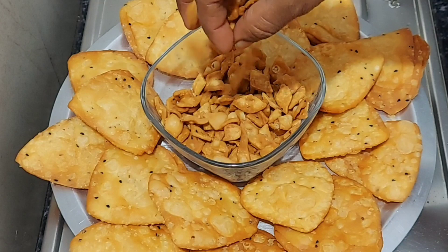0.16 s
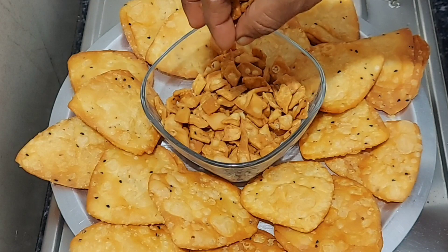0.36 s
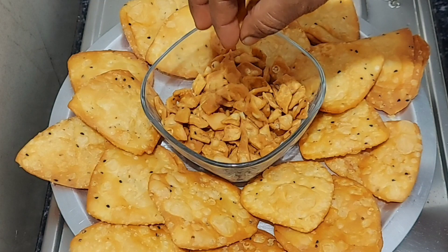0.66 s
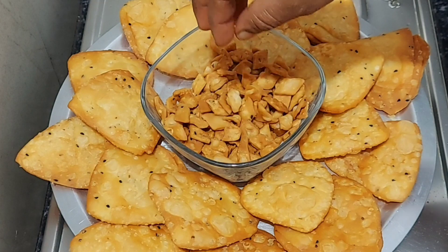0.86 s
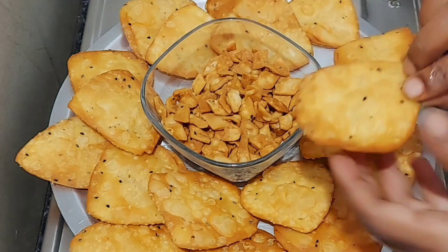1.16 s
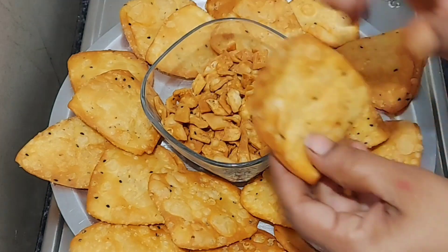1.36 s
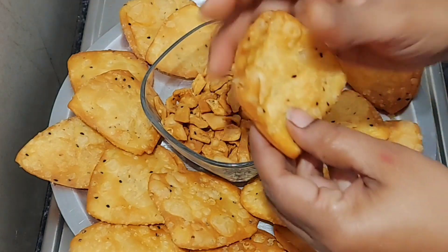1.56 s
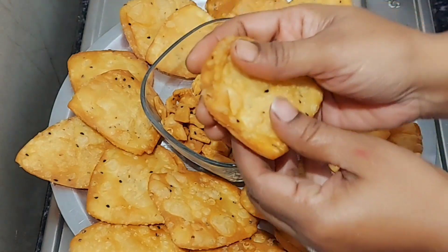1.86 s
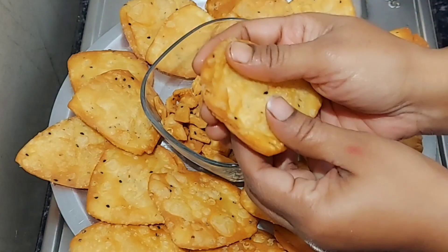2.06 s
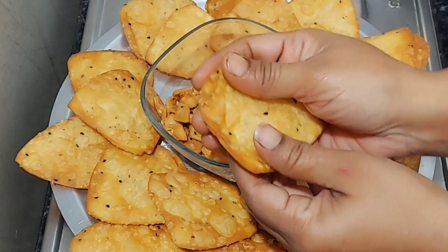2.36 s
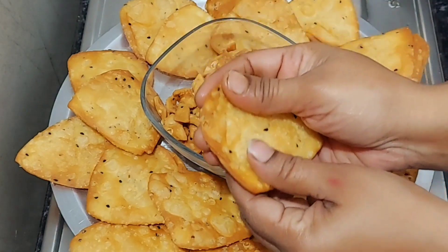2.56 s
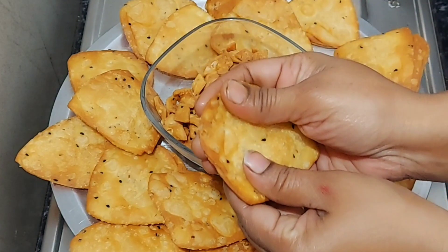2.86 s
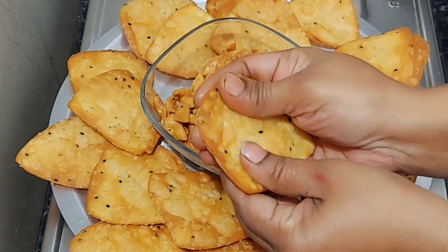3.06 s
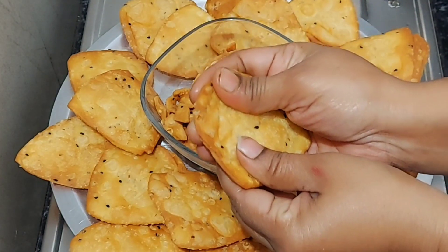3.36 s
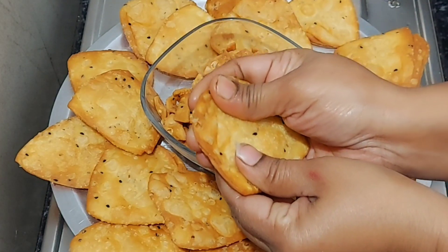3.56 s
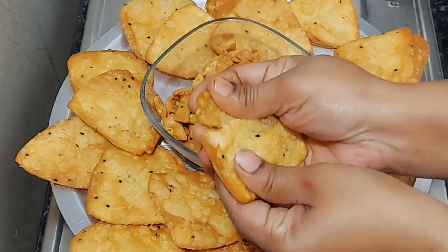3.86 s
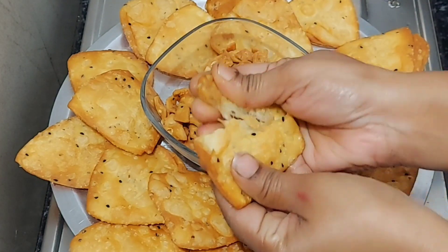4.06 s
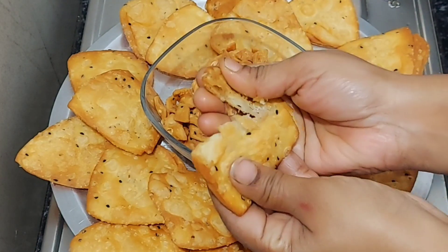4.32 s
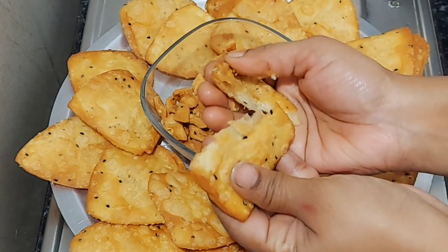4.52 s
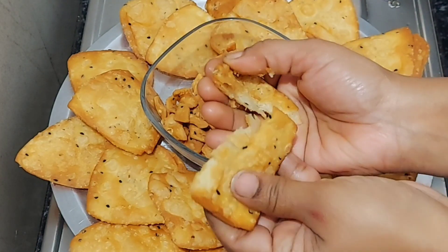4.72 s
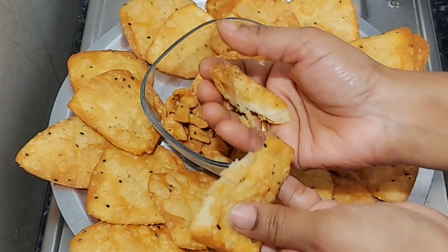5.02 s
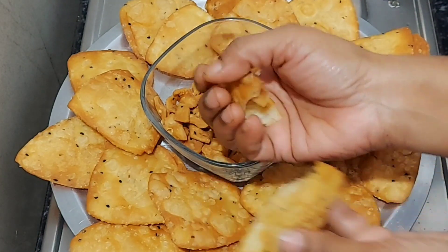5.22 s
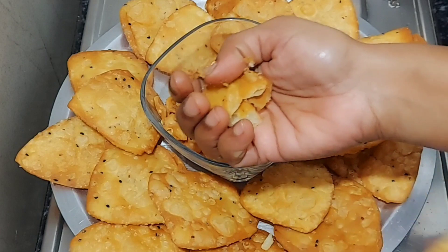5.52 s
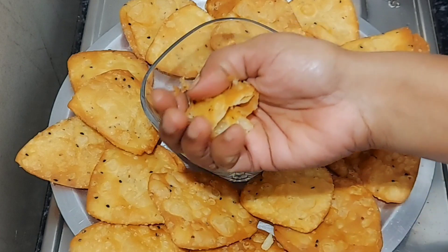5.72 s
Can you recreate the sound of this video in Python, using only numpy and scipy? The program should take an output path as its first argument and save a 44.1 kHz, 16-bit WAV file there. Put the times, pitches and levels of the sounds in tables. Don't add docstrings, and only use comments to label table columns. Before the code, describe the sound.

Crisp fried pieces patter into a ringing glass bowl, then a large crisp is rubbed and snapped in loud clustered crunches, with faint crumbling afterwards.

```python
import sys
import numpy as np
from scipy import signal
from scipy.fft import rfft, irfft, next_fast_len
from scipy.io import wavfile
from scipy.ndimage import map_coordinates

SR = 44100
rng = np.random.default_rng(int(sys.argv[2]) if len(sys.argv) > 2 else 0)


def ratio_of_db(decibels):
    return 10 ** (np.asarray(decibels, float) / 20)


def transcribe(signal):
    frames = np.atleast_2d(signal).T
    limited = np.clip(frames, -1, 1)
    pcm = np.round(limited * 32767).astype(np.int16)
    wavfile.write(sys.argv[1], SR, pcm)


N = 259605


def unit(x):
    return x / np.sqrt(np.mean(x ** 2) + 1e-20)


def along(points, hz):
    f, v = np.transpose(points)
    return np.interp(np.log(hz + 1), np.log(f + 1), v)


def curves(rows):
    s, *columns = np.transpose(rows)
    return [np.interp(np.arange(N) / SR, s, column) for column in columns]


def sides(pan_db):
    return ratio_of_db(np.array([pan_db / 2, -pan_db / 2]))


def wobble(rate, size=N):
    knots = rng.standard_normal(int(size * rate / SR) + 4)
    return map_coordinates(knots, [np.arange(size) * rate / SR])


def filtered(x, response):
    m = next_fast_len(N + SR // 2)
    return irfft(rfft(x, m) * response(np.fft.rfftfreq(m, 1 / SR)), m)[..., :N]


def peak(f, hz, width_hz):
    return 1j * f * width_hz / (hz * hz - f * f + 1j * f * width_hz)


# (f/Hz, correlation)
PORT_LIKENESS = [(60, 0.8), (180, 0.93), (550, -0.094), (1650, -0.03), (4970, -0.26), (15000, 0.36)]


def stereo(pair, spectrum):
    def mixing(hz):
        turn = np.arccos(np.clip(along(PORT_LIKENESS, hz), -1, 1)) / 2
        return ratio_of_db(along(spectrum, hz)) * [np.cos(turn), np.sin(turn)]

    mid, side = filtered(pair, mixing)
    return unit(np.array([mid + side, mid - side]))


def strokes(rows):
    swing_db = 20
    t, level = np.arange(N) / SR, np.full(N, -120.)
    for s, db, rise, fall in rows:
        away = np.maximum((s - t) / max(rise, .002), (t - s) / max(fall, .002))
        level = np.maximum(level, db - swing_db * away)
    return level


def fractures(rows, t60, width, body_spread, treble_spread, kick):
    size = 2048
    out = np.zeros((2, N + SR))
    t, f = np.arange(size // 2) / SR, np.fft.rfftfreq(size, 1 / SR)
    for s, db, snap_db, hz, *length in rows:
        shared, spikes, *own = rng.standard_normal((4, len(t)))
        own = np.array(own)
        shared[8:11] += kick
        spiky = ratio_of_db(4 * np.repeat(spikes, 16)[:len(t)])
        decay = ratio_of_db(-60 * np.maximum(t - sum(length), 0) / t60)
        shape = spiky * decay * (1 - np.exp(-t / 0.00012))
        low = rfft(shape * (shared + body_spread * own), size)
        fading = ratio_of_db(-60 * t / 0.033)
        high = rfft(shape * fading * (shared + treble_spread * own), size)
        piece = peak(f, hz, width * hz) + 0.29 * peak(f, hz, 2.0 * hz)
        body = irfft(low * piece * peak(f, 3680, 7300) ** 2, size)
        snap = irfft(high * peak(f, 11000, 18000) ** 2, size)
        snap_gain = ratio_of_db(snap_db + 6.0) * sides(3.1)[:, None]
        both = body / np.abs(body).max() + snap_gain * snap / np.abs(snap).max()
        out[:, round(s * SR):][:, :size] += ratio_of_db(db + 1.21) * both
    return out[:, :N]


# (t/s, peak level/dB, treble level/dB re peak, body f/Hz)
LANDINGS = [(0.0523, -19, -2.5, 4330), (0.1688, -40, 0.5, 3230), (0.1741, -29, 1, 3230),
            (0.1833, -17, -6.5, 3730), (0.1926, -27.5, -5, 6030), (0.264, -30, -3.5, 3620),
            (0.2681, -28, 4.5, 8440), (0.3064, -20.5, -13.5, 3080), (0.3718, -42, 7, 2970),
            (0.6386, -42.5, -1.7, 6440), (0.6612, -42.5, 5.5, 2260), (0.6756, -30.5, 0, 6140),
            (0.6811, -24.5, -1, 8700), (0.6902, -25, -6.5, 3550), (0.7131, -26.5, 0, 6070),
            (0.7241, -25.5, -4.5, 3320), (0.7396, -25, -12, 5960), (0.7499, -23.5, 0.4, 3100),
            (0.7538, -23, 2, 6100), (0.7814, -23.5, -4, 2840), (0.7855, -28.5, -4, 4630),
            (0.8269, -32.5, -10, 3100)]
BLISTERS = [(0.5238, -36.5, -26, 7040), (1.2467, -30.5, -5, 7260), (1.3172, -47, -1.5, 7200),
            (1.6484, -59.5, 10.5, 6830), (2.1521, -36, -18.5, 4910), (2.1589, -37, -14, 4850),
            (2.2478, -33.5, -19, 4520), (2.5212, -41.5, -3.5, 6090), (2.5419, -37.5, -9, 6030),
            (2.5543, -31.5, -7, 5040), (2.58, -45, 2.5, 4910), (2.6351, -54.5, 1, 7320),
            (2.6799, -43, -4.5, 5040), (2.6869, -42.5, -3, 3900), (2.7438, -33, -6.5, 4200),
            (2.754, -38.5, -7.5, 4090), (2.8616, -53, 13.5, 8480), (2.8786, -32.5, -4.5, 5170),
            (2.897, -36, -11.5, 5020), (2.9101, -40.5, 4, 2880), (2.9666, -47, 3.5, 6290),
            (2.9753, -43, 5, 4670), (2.9795, -27.5, 6.5, 8420), (3.001, -34, 14.5, 8480),
            (3.3197, -29.5, 1.5, 6030), (3.8866, -21, -3.5, 5400)]
SPLITS = [(3.0065, -18, -5, 6700), (3.1084, -32, -5, 2462), (3.1479, -15.5, -14.5, 2450),
          (3.1554, -20, -3, 2370), (3.1852, -31, -3, 2450), (3.1979, -22, -12, 2300),
          (3.2302, -36.5, 2, 2336), (3.3001, -42.5, 3, 6220), (3.3257, -34, 2, 4200),
          (3.3286, -31.5, -5.5, 3890), (3.3731, -41.5, -7, 3480), (3.409, -30, -10.5, 2260),
          (3.455, -37.5, -1.5, 3880), (3.4694, -19, -5.5, 3730), (3.5004, -25.5, -3, 4260),
          (3.5123, -25, -12.5, 3875), (3.5203, -24.5, -5, 3876), (3.5296, -19, -6.5, 2250),
          (3.533, -24.5, -5, 5494), (3.5497, -19, -2, 3536), (3.563, -22, -8.5, 2280),
          (3.5647, -1, -10.5, 2387), (3.5708, -10.5, -11, 5570), (3.5759, -12, -9.5, 3100),
          (3.5848, -20.5, -7, 3440), (3.605, -12.5, -5, 5320), (3.6876, -6, -13.5, 2370),
          (3.7148, -11, -12.5, 2710), (3.723, -16, -11, 2580), (3.7382, -12.5, -14, 2480),
          (3.7491, -16.5, -12, 2203), (3.7605, -22.5, -9, 2410), (3.8114, -32, 1.5, 2580),
          (3.838, -18, -21, 2520), (3.8471, -25.5, -15, 2780), (3.8511, -19.5, -17.5, 2510),
          (3.8636, -19, -3, 2600), (3.8821, -24.5, -9, 2560), (3.9768, -43, 5.5, 5000),
          (4.037, -37, -9.5, 2530), (4.0409, -53.5, 12, 3230), (4.1501, -47, -9, 6290)]
CRUSHED = [(4.284, -48.5, -3.5, 3580), (4.7138, -43, -4.5, 5640), (4.7962, -52, 11, 8480),
           (4.8286, -47.5, 12, 8480), (5.0601, -30.5, -20.5, 2690), (5.158, -42.5, -2.5, 5500),
           (5.1847, -40, 0, 8300), (5.2182, -44.5, 7, 7210), (5.2342, -42.5, 5, 7110),
           (5.2978, -44, 5, 8400), (5.3452, -41, -0.5, 5300), (5.357, -40.5, 1.5, 4650),
           (5.3787, -29, -6, 5850), (5.3926, -37, -4, 5700), (5.4049, -29.5, 1, 5430),
           (5.4394, -35.5, 2.5, 7080), (5.4738, -41, 0.5, 4380), (5.4816, -37.5, -4, 4910),
           (5.5975, -49.5, 0.5, 4010), (5.626, -43.5, 2.5, 5560), (5.6471, -32, 3, 5700),
           (5.7083, -29, 1, 6230), (5.7507, -43, 3, 6030), (5.778, -45, 3.5, 5490),
           (5.7967, -29, 2.5, 6360), (5.864, -32, 5.5, 6290)]


def cracks():
    rows = [*LANDINGS, *BLISTERS, *SPLITS, *CRUSHED]
    return fractures(rows, t60=0.0034, width=0.19, body_spread=0.073, treble_spread=7.3, kick=4)


# (t/s, peak level/dB, treble level/dB re peak, body f/Hz, length/s)
TEARS = [
    (0.288, -17.5, -14, 4770, 0.0013),
    (3.0112, -8.5, -4.5, 2465, 0.0052),
    (3.0118, -14, -29.5, 1124, 0.0066),
    (3.566, -10, -12.5, 2509, 0.0013),
    (3.6817, -3, -4.5, 2340, 0.0049),
    (5.841, -19.5, -1.5, 5320, 0.0029),
]


def tears():
    return fractures(TEARS, t60=0.0098, width=0.33, body_spread=0.47, treble_spread=8.8, kick=1.8)


def crumbs(rate, spread_db, noise):
    chance = rate / SR * ratio_of_db(1.3 * wobble(40))
    sizes = ratio_of_db(spread_db * rng.exponential(1, (2, N))) * rng.choice([-1, 1], (2, N))
    grains = (rng.random((2, N)) < chance) * sizes
    return unit(grains) + noise * rng.standard_normal((2, N))


# (f/Hz, level/dB per Hz)
FIZZ = [(5500, -43), (7500, -5), (9000, -3), (12000, 0), (14000, 2), (16500, -8.5)]


def rubbing(rows, surface, rate, spread_db, noise):
    body_db = strokes([row[:4] for row in rows])
    fizz_db = strokes([(s, db + rel_db, rise, fall) for s, db, rise, fall, rel_db in rows])
    body = ratio_of_db(body_db) * stereo(crumbs(rate, spread_db, noise), surface)
    return body + ratio_of_db(fizz_db) * stereo(crumbs(rate, spread_db, noise), FIZZ)


# (peak t/s, level/dB, rise/s, fall/s, fizz level/dB re body)
RUBS = [(.642, -59, .004, 0.36, -10), (.68, -47, .01, 0.19, -8.5), (.758, -35, 0.081, 0.07, -7.5),
        (1.244, -43.5, 0.0365, 0.055, -8), (1.3, -60, 0.13, 0.16, -8), (1.66, -67.5, 0.081, 0.09, -5.5),
        (1.763, -57.5, 0.0091, 0.42, -13), (1.879, -50, 0.11, 0.14, -7.5), (2.12, -61, 0.29, 0.089, -8),
        (2.15, -49.5, 0.05, 0.095, -14.5), (2.246, -52, .01, 0.18, -21), (2.314, -56, 0.29, 0.13, -8.5),
        (2.718, -59.5, 0.27, 0.56, -3.5), (2.9, -58.5, 0.59, .2, -5.5), (4.46, -71.5, 0.0235, 0.99, -0.5),
        (4.648, -55, 0.012, 0.19, 3.5), (4.83, -61.5, .01, 0.18, 3), (5.07, -61, 0.026, 0.62, -9),
        (5.24, -55, 0.29, 0.5, -2.5), (5.41, -47.5, 0.085, 0.18, -4.5), (5.71, -56, 0.12, .3, -8.5),
        (5.85, -48.5, 0.71, 0.607, -5)]
# (f/Hz, level/dB per Hz)
CRUST = [(1060, -17), (1800, -13), (2150, -19), (2730, -3.5), (4500, -2), (5020, 0.5), (7910, -7.5),
         (8500, -13), (11000, -28), (18700, -120)]


def crust_rubbing():
    return rubbing(RUBS, CRUST, rate=3400, spread_db=2.5, noise=1.2)


# (peak t/s, level/dB, rise/s, fall/s, fizz level/dB re body)
GRINDS = [(0.001, -39.5, 0.0079, .24, -14), (.228, -56.5, 0.83, .33, -2.5), (3.02, -39, 0.012, .15, -9),
          (3.58, -33, .012, .12, -10), (3.15, -66, 0.41, 0.52, 6.5), (3.492, -47.5, 0.3, 0.25, -13),
          (3.656, -45, 0.73, .1, -6.5), (3.734, -30.5, 0.12, 0.17, -14), (3.95, -55.5, .3, 0.079, 0),
          (4.045, -46, 0.06, .14, -9.5), (4.21, -58, .8, 0.16, -6)]
# (f/Hz, level/dB per Hz)
CORE = [(590, -48), (1000, -22), (1090, -33.5), (1360, -10), (1810, -11.5), (2400, -3.5), (3200, -6),
        (3730, -2), (4270, -8.5), (5580, -5.5), (8500, -18.5), (11000, -45), (18700, -120)]


def core_grinding():
    return rubbing(GRINDS, CORE, rate=2300, spread_db=2.0, noise=0.23)


# (t/s, left-right level/dB)
HANDS = [(0.0, -0.5), (0.21, 0.5), (0.49, -4.5), (0.59, 0.5), (1.1, -5), (1.13, -2.5), (2.38, -2.5),
         (2.98, -2), (4.54, -1), (5.25, -1), (5.36, -2), (5.89, -1.5)]


def at_hands(x):
    left_leads_s = 0.00003
    lags = left_leads_s * np.array([[0], [1]])
    return sides(curves(HANDS)[0]) * filtered(x, lambda f: np.exp(-2j * np.pi * f * lags))


# (t/s, then level/dB of the four strong modes, low to high)
STRIKES = [(0, -44.5, -60, -42, -36), (0.0525, -34, -32, -40, -32), (0.1835, -49.5, -55, -58, -64),
           (0.2275, -54, -40, -50, -61), (0.2325, -49.5, -36.5, -49.5, -58),
           (0.2883, -37, -22.5, -27.5, -41.5), (0.3065, -31, -31.5, -32, -32.5),
           (0.3718, -43, -41.5, -43.5, -48), (0.7234, -45.5, -37, -49, -46), (0.7538, -59, -44, -50, -57),
           (0.7895, -54, -52, -54, -66), (0.827, -55.5, -47, -55, -59)]
# (f/Hz, t60/s)
BOWL = [(1927, 0.27), (3268, 0.19), (4730, 0.16), (5245, 0.13)]
# (f/Hz, level/dB re rim, t60/s)
RIM = [(1352, -16, 0.3), (7280, -2, 0.24), (10080, -6.5, .12), (10227, -14.5, 0.21), (12602, -15, .28),
       (13340, -12, 0.14), (13830, -18.5, .25), (14850, -23.5, .2), (15110, -17, .2)]


def bowl(crumbs_in):
    t = np.arange(SR + SR // 5) / SR
    out = np.zeros((2, N))
    s, *strong_db = np.transpose(STRIKES)
    rim_db = np.max(strong_db, axis=0) - 14.5
    modes = [(hz, db + 2.5, t60) for (hz, t60), db in zip(BOWL, strong_db)]
    for hz, db, t60 in RIM:
        modes.append((hz, rim_db + db + 3.0 + rng.normal(0, 5.6, len(s)), t60))
    since = np.maximum(t - s[:, None], 0)
    attack = 1 - np.exp(-since / 0.00049)
    for hz, db, t60 in modes:
        lean, phase = rng.normal(0, 1, 2)
        ring = ratio_of_db(db) @ (attack * np.exp(-np.log(1000) * since / t60))
        touching = ratio_of_db(2.2 * wobble(70, size=len(t)))
        tone = np.sin(2 * np.pi * hz * t + 0.58 * np.array([[phase], [-phase]]))
        out[:, :len(t)] += sides(1.2 * lean - 1.5)[:, None] * ring * touching * tone

    def glass(f):
        return sum(peak(f, hz, np.log(1000) / np.pi / t60) for hz, t60 in BOWL)

    return out + ratio_of_db(6.5) * filtered(crumbs_in, glass)


# (peak t/s, level/dB, rise/s, fall/s)
THUD = [(.08, -53, .5, 0.081), (.2, -55.5, 0.013, .2), (.3, -52, 0.25, 0.15), (.655, -53, .015, 0.39),
        (.788, -41, .14, 0.092), (2.93, -61, .3, 0.13), (3.013, -58.5, .01, 0.16), (3.544, -68, .15, 0.32),
        (3.76, -63.5, 0.47, 0.051), (5.064, -54.5, .01, 0.19), (5.28, -68.5, .3, 0.074)]
# (f/Hz, width/Hz, level/dB)
HEAP = [(345, 35, 3), (428, 24, 0.5), (390, 61, -5), (800, 4200, -13)]


def tray():
    thuds = rng.standard_normal(N) * ratio_of_db(0.56 * wobble(60))
    heap = unit(filtered(thuds, lambda f: sum(ratio_of_db(db) * peak(f, hz, w) for hz, w, db in HEAP)))
    return ratio_of_db(strokes(THUD) + 2.5) * heap


# (f/Hz, t60/s)
KITCHEN = [(500, 0.5), (2500, 0.31), (7000, 0.32), (15000, 0.22)]


def kitchen(x, early_db=6, early_t60=0.011):
    out = np.zeros((2, N + 2 * SR))
    step = SR // 5
    for i in range(0, N, step):
        hz, t, z = signal.stft(rng.standard_normal((2, SR // 2)), SR, nperseg=256)
        decay = ratio_of_db(-60 * t / along(KITCHEN, hz)[:, None]) + ratio_of_db(early_db - 60 * t / early_t60)
        tail = signal.istft(z * decay, SR, nperseg=256)[1]
        wet = signal.fftconvolve(x[:, i:i + step], tail / np.linalg.norm(tail[0]), axes=1)
        out[:, i + 60:][:, :wet.shape[1]] += wet
    return out[:, :N]


# (t/s, level/dB)
TRAFFIC = [(0.0, -45.5), (0.2, -55.5), (0.43, -47), (0.55, -54), (0.82, -51), (1.01, -56.5), (1.11, -62),
           (1.72, -58.5), (2.2, -59), (2.93, -58), (3.15, -60), (3.24, -54), (3.52, -57.5), (3.72, -54),
           (4.33, -62), (4.62, -59), (4.92, -59), (5.1, -55), (5.89, -56)]
# (f/Hz, level/dB per Hz)
RUMBLE = [(25, -32.5), (40, -23.5), (52, -13.5), (64, 2), (80, -10), (102, -1.5), (125, 0), (160, -10),
          (200, -7.5), (260, -23.5), (340, -22.5), (450, -26.5), (900, -120)]
# (f/Hz, left-right level/dB)
LEAN = [(60, -9.5), (240, -4.5), (950, -3), (3770, -4), (15000, -2)]
# (f/Hz, level/dB per Hz)
STREET = [(150, -38.5), (250, 1.5), (540, -9.5), (601, -3), (954, -7.5), (1910, -51.5), (2500, -27),
          (3250, -58), (5500, -120)]


def traffic():
    street_start_db, nears_db_per_s, follows = -77.5, 2, 1
    rumble_db, = curves(TRAFFIC)
    swell_db = rumble_db - rumble_db.mean()
    street_db = street_start_db + nears_db_per_s * np.arange(N) / SR + follows * swell_db
    rumble = ratio_of_db(rumble_db) * stereo(rng.standard_normal((2, N)), RUMBLE)
    street = ratio_of_db(street_db + 3.5) * stereo(rng.standard_normal((2, N)), STREET)
    return filtered(rumble, lambda f: sides(along(LEAN, f))) + street


# (start t/s, end t/s, f/Hz, width/Hz, level/dB)
TONES = [(1.9, 2.95, 1720, 60, -75), (2.5, 2.95, 866, 30, -73), (2.05, 2.5, 771, 40, -77),
         (2.2, 2.9, 3187, 50, -76), (4.24, 4.65, 3198, 50, -70.5), (4.66, 4.7, 3198, 50, -74),
         (4.78, 5.6, 3195, 50, -71), (4.22, 4.33, 800, 40, -72), (1.6, 1.75, 3150, 90, -79),
         (4.2, 5.0, 3650, 30, -81), (4.8, 5.89, 620, 90, -74), (2.66, 2.96, 1720, 150, -76)]


def far_tones():
    out = np.zeros((2, N))
    for start, end, hz, width_hz, db in TONES:
        span = slice(round(start * SR), round(end * SR))
        t = np.arange(N)[span] / SR
        fade = np.clip(np.minimum(t - start, end - t) / 0.018, 0, 1)
        a, b = [np.array([wobble(1.5 * width_hz, size=len(t)) for side in "LR"]) for part in "ab"]
        turn = 2 * np.pi * hz * t
        tone = unit((0.6 + a) * np.sin(turn) + b * np.cos(turn))
        out[:, span] += ratio_of_db(db + 7.5) * fade * tone / 2
    return out


# (f/Hz, level/dB per Hz)
HISS = [(590, -18.5), (1000, -3), (1500, -1.5), (2280, -9), (3200, -7), (3710, -6.5), (4360, -13.5),
        (5630, -5.5), (14900, -15), (16000, -5)]


def hiss():
    return ratio_of_db(-62 - 8.0) * stereo(rng.standard_normal((2, N)), HISS)


def scene():
    crust = cracks() + tears()
    rustle = crust_rubbing() + core_grinding()
    glass = bowl(rustle * (np.arange(N) < SR))
    near = at_hands(crust + rustle) + glass + tray()
    room = kitchen(ratio_of_db(0.5) * crust + ratio_of_db(-4.5) * glass)
    return near + room + traffic() + far_tones() + hiss()


def band_limit(x):
    return signal.sosfilt(signal.butter(12, 16970, fs=SR, output="sos"), x)


def record(dry):
    top, top_hz = .95, 15900
    rounded = dry / (1 + np.abs(dry / top) ** 4) ** (1 / 4)
    mix = filtered(rounded, lambda hz: np.where(hz < top_hz, 1, ratio_of_db(-29.0)))
    return band_limit(mix)


dry = scene()
out = record(dry)
transcribe(out)
```